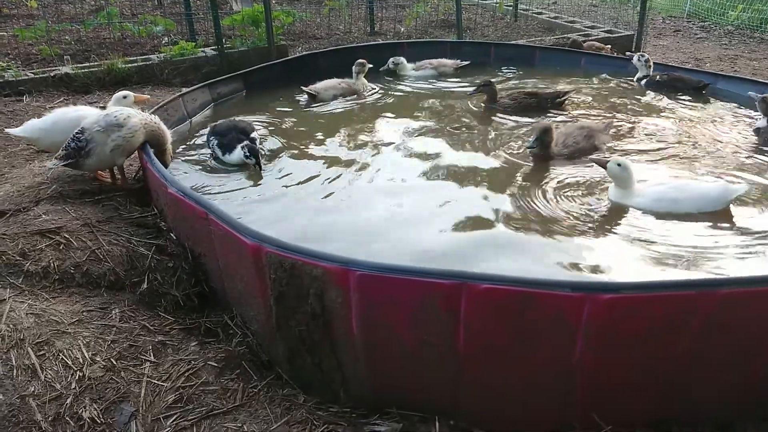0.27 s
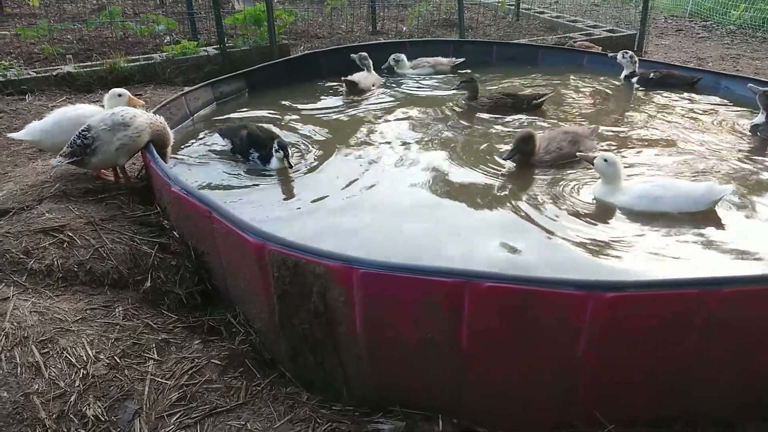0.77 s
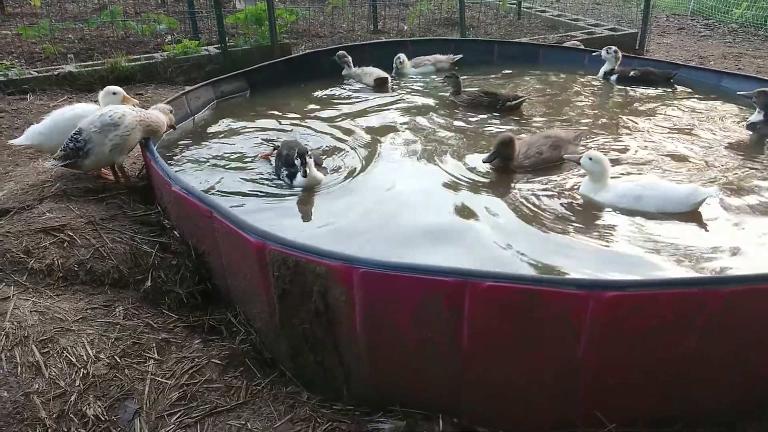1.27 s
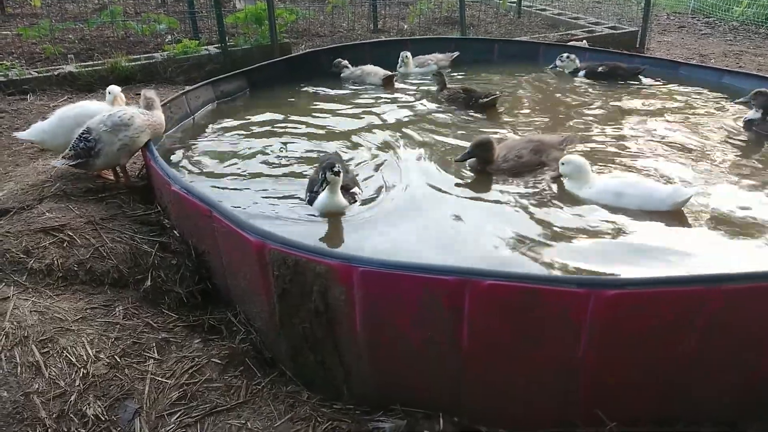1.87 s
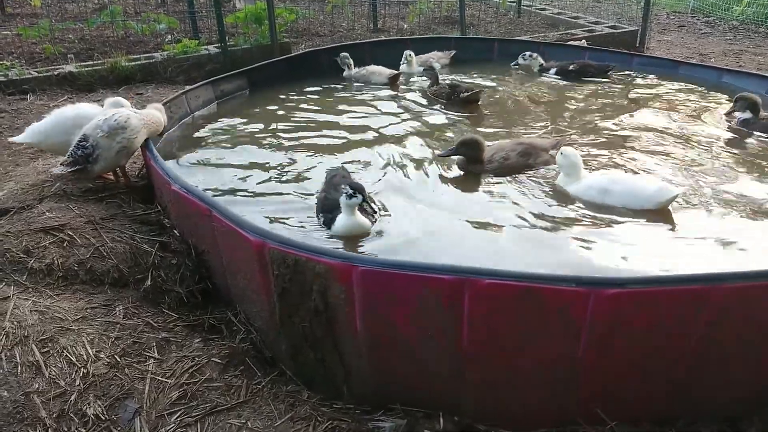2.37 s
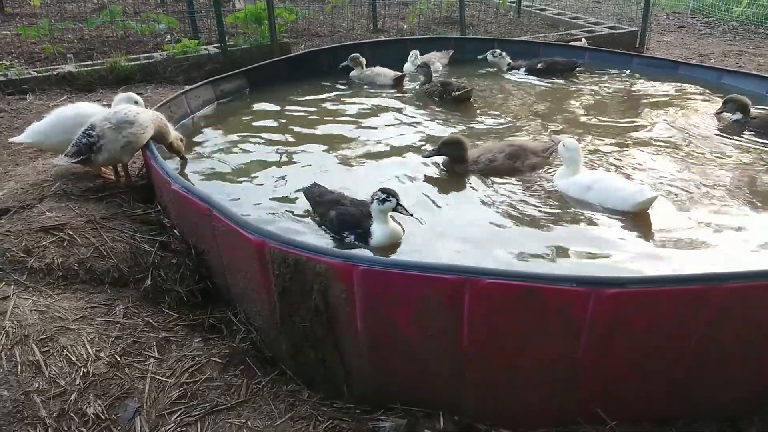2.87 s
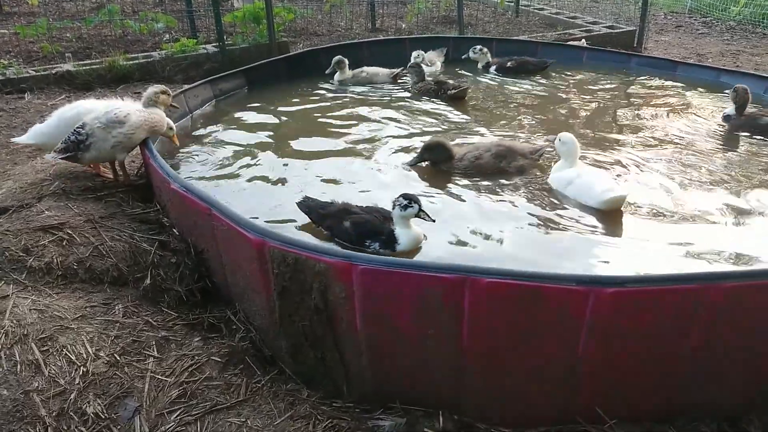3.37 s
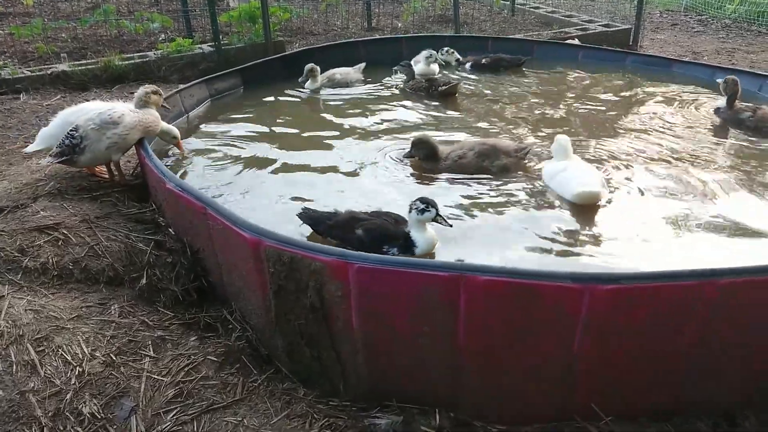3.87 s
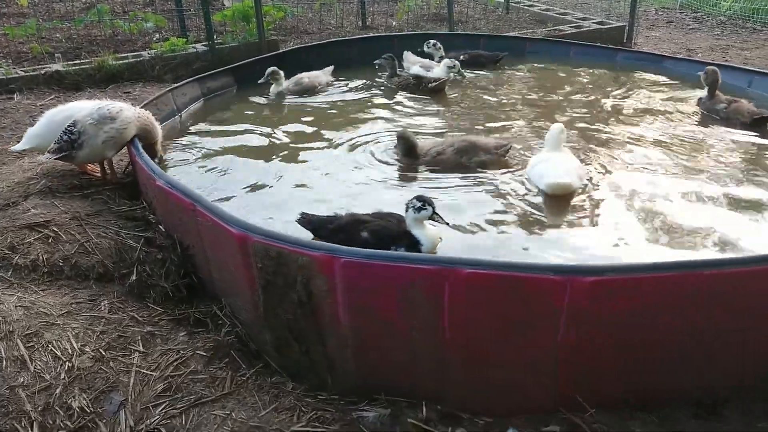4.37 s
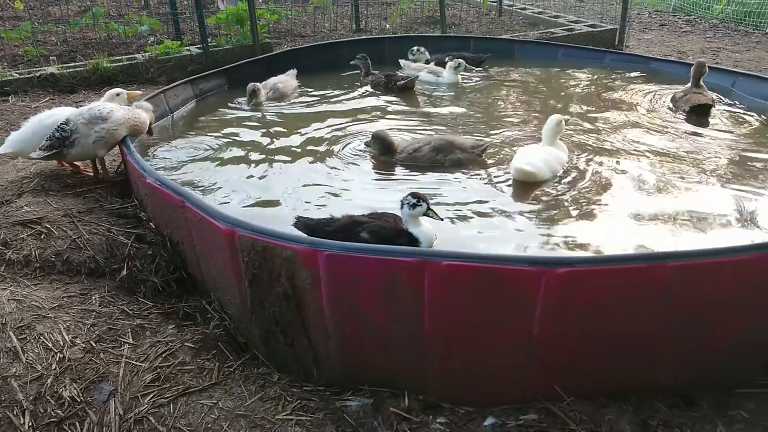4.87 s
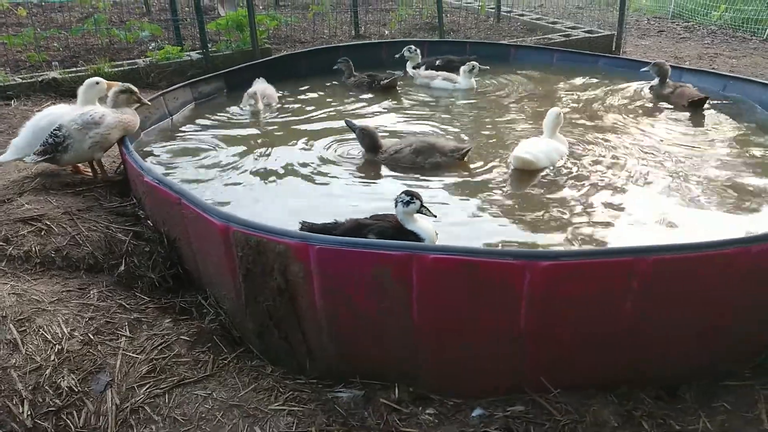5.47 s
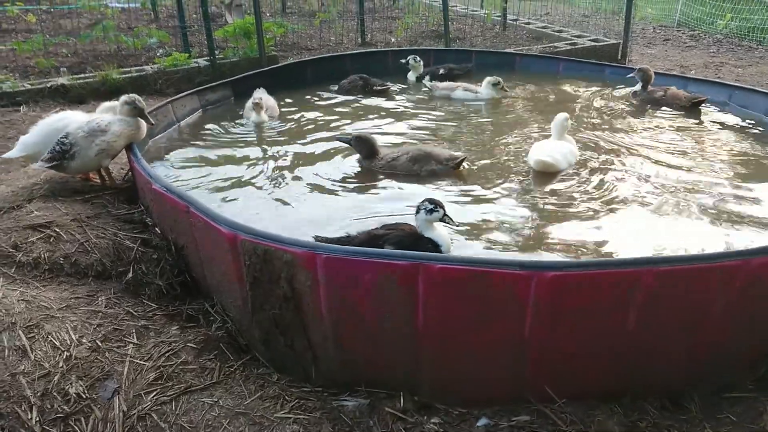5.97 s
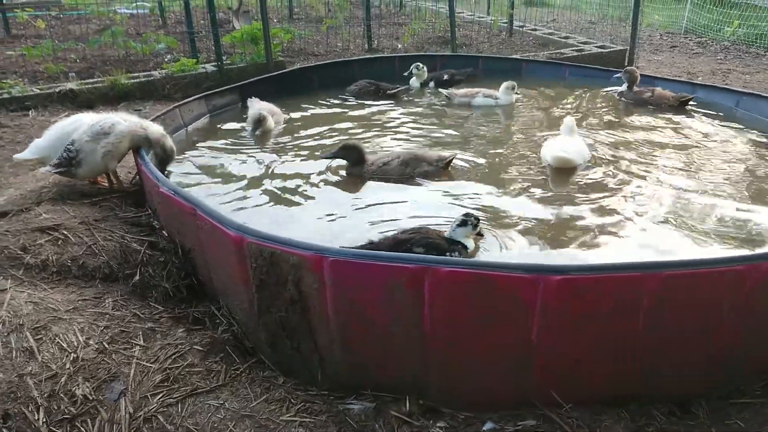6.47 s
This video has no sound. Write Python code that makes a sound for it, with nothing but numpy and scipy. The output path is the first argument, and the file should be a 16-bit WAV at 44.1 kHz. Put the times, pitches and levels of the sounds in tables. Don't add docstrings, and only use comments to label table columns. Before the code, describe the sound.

A hen duck quacks slowly while a drake rasps, then another chuckles in quick runs over trickling water, birdsong and distant engine hum.

```python
import sys
import numpy as np
from scipy import signal
from scipy.fft import rfft, irfft
from scipy.io import wavfile
from scipy.ndimage import uniform_filter1d

SR = 44100
rng = np.random.default_rng(int(sys.argv[2]) if len(sys.argv) > 2 else 0)


def ratio_of_db(decibels):
    return 10 ** (np.asarray(decibels, float) / 20)


def to_wav(sig):
    pcm = np.clip(np.atleast_2d(sig), -1, 1) * 32767
    pcm = np.round(pcm).astype(np.int16)
    wavfile.write(sys.argv[1], SR, pcm.T)


N = 296352


def evened(x):
    return x / np.sqrt(np.mean(x ** 2) + 1e-20)


def read(points, hz):
    f, value = np.transpose(points)
    return np.interp(np.log(hz + 1), np.log(f + 1), value)


def curves(rows):
    s, *columns = np.transpose(rows)
    t = np.arange(s[0], s[-1], 1 / SR)
    return [t] + [np.interp(t, s, c) for c in columns]


def add(mix, s, sound):
    at = round(s * SR)
    sound = sound[max(-at, 0):]
    part = mix[max(at, 0):][:len(sound)]
    part += sound[:len(part)]


def resonate(x, hz, width):
    turn = np.exp(2j * np.pi * np.cumsum(hz * np.ones(len(x))) / SR)
    r = np.exp(-np.pi * width / SR)
    return 2 * (turn * signal.lfilter([1 - r], [1, -r], x / turn)).real


def wander(count, span_s):
    span = round(span_s * SR)
    return evened(uniform_filter1d(uniform_filter1d(rng.standard_normal(count), span), span))


def ports(x, lag_ms):
    hz = np.fft.rfftfreq(N, 1 / SR)
    left = irfft(rfft(x) * np.exp(-2j * np.pi * hz * lag_ms / 1000), N)
    return np.array([left, x])


def tones(tables, waver_db, waver_s, overtone_db, taper):
    out = np.zeros(N)
    for rows in tables:
        t, hz, level_db = curves(rows)
        turn = 2 * np.pi * np.cumsum(uniform_filter1d(hz, size=80)) / SR
        tone = np.sqrt(2) * (np.sin(turn) + ratio_of_db(overtone_db) * np.sin(2 * turn))
        level = ratio_of_db(level_db + waver_db * wander(len(t), waver_s))
        add(out, t[0], level * tone * signal.windows.tukey(len(t), taper))
    return out


def glides(rows):
    first_db, last_db = -11, -6.5
    return [[(s, a, db + first_db), (s + length / 2, (a + b) / 2, db), (s + length, b, db + last_db)]
            for s, length, a, b, db in rows]


def drops(rows, t60, trim_db, glide, edge_db, lag_ms):
    out, t = np.zeros(N), np.arange(6000) / SR
    for s, peak_db, hz in rows:
        ring = np.sin(2 * np.pi * hz * t * (1 + glide * t / t60))
        ring = ring * ratio_of_db(-60 * t / t60) * (1 - np.exp(-t * hz / 0.17))
        edge = ratio_of_db(edge_db - 60 * t / 0.0047) * np.gradient(rng.choice([-1., 1.], len(t)))
        add(out, s, ratio_of_db(peak_db + trim_db - read(RIGHT_PORT, hz)) * (ring + edge))
    return ports(out, lag_ms)


# (frequency [Hz], level per Hz [dB])
YARD_SPECTRUM = [(40, -42), (50, 2), (65, 24), (110, 19), (200, 13), (350, 7), (700, 3.5), (1500, 6),
                 (3000, 6.5), (5000, 8.5), (8000, -5), (15000, 9)]
# (frequency [Hz], likeness [0-1])
PORT_LIKENESS = [(60, 0.91), (200, 0.66), (500, 1), (1500, 0.53), (4000, 0.3), (8000, 0.11)]
# (time [s], level [dB])
BREEZE = [(0.0, -69), (0.65, -76.5), (3.2, -74.5), (3.7, -79), (5.3, -77.5), (5.7, -85), (6.4, -87.5),
          (6.72, -79.5)]


def yard():
    rustle_follows = 0.4
    rustle_db, fizz_db, fizz_flicker_db = 0.5, 2, 1.6
    low_patch_db, patch_db = 1.0, 1.8
    frames, hz = N // 256 + 5, np.fft.rfftfreq(1024, 1 / SR)
    a, b, c, d, patches = rng.standard_normal((frames, 513, 5)).T
    patches = evened(uniform_filter1d(uniform_filter1d(patches, 14, 0), 10, 1))
    f = hz[:, None]
    high = np.clip((f - 5300) / 2500, 0, 1)
    moving = np.clip((f - 800) / 1500, 0, 1) * (1 - .5 * np.exp(-((f - 4700) / 800) ** 2))

    s, breeze_db = np.transpose(BREEZE)
    breeze_now_db = np.interp(np.arange(frames) * 256 / SR, s, breeze_db) - breeze_db.mean()
    follows = rustle_follows + (1 - rustle_follows) * high
    drift_db = (1 - high) * rustle_db + high * fizz_db + follows * breeze_now_db

    flutter = evened(uniform_filter1d(rng.standard_normal(frames), size=3))
    insects_db = 3.4 * np.exp(-((f - 4750) / 350) ** 2) * flutter
    gusts = evened(uniform_filter1d(rng.standard_normal(frames), size=9))
    gusts_db = fizz_flicker_db * high * gusts
    patches_db = np.where(f < 500, low_patch_db, patch_db) * patches
    level_db = read(YARD_SPECTRUM, f) + patches_db + insects_db + gusts_db + moving * drift_db - 88.0

    same = np.clip(read(PORT_LIKENESS, f), 0, 1)
    right = a + 1j * b
    left = same * right * np.exp(-2j * np.pi * f * 0.24 / 1000)
    left = left + np.sqrt(1 - same ** 2) * (c + 1j * d)
    z = np.array([left, right]) * ratio_of_db(level_db)
    return signal.istft(z, nperseg=1024, noverlap=768)[1][:, :N]


# (time [s], pitch [Hz], level [dB])
ENGINES = [
    [(.6, 166, -73.5), (1.5, 168.4, -65), (2.4, 168.2, -57.5), (3.2, 171.5, -53), (4, 176.4, -51),
     (4.7, 187.2, -58), (5.3, 195.7, -59), (5.55, 212, -63), (5.95, 230.3, -70)],
    [(0.0, 59.2, -63.5), (2.81, 68.2, -67), (6.38, 64.65, -69.5), (6.72, 59.8, -62.5)],
    [(0.0, 105.7, -61), (0.91, 103.4, -69.5), (3.78, 111.2, -66.5), (4.1, 104, -60.5)],
    [(5.2, 87.3, -65.5), (6.066, 131.7, -68), (6.398, 186.4, -64), (6.588, 151.6, -61.5), (6.72, 155, -72)],
]


def distant_engines():
    return ratio_of_db(-3.5) * tones(ENGINES, 2.03, 0.028, -32.0, 0.0079)


def crackle(per_s, level_db, spread_db):
    struck = rng.random((N, 2)).T < per_s / SR
    size = ratio_of_db(spread_db * np.minimum(rng.exponential(1, (N, 2)).T, 5)) * struck
    tick = rng.standard_normal(40) * np.exp(-np.arange(40) / 16.5)
    both = size + 2.87 * np.roll(size[::-1], 6, axis=1)
    return ratio_of_db(level_db) * signal.oaconvolve(both, np.diff(tick)[None])[:, :N]


# (time [s], peak level [dB])
SNAPS = [(0.2204, -56), (0.239, -45), (0.415, -48), (0.517, -49), (0.6704, -53), (0.7168, -55),
         (0.8011, -57), (0.9971, -50), (1.1543, -60), (1.187, -49), (1.2765, -49), (1.715, -50),
         (1.9155, -50), (1.9939, -52), (2.006, -44), (2.0448, -48), (2.2087, -54), (2.2882, -57),
         (2.372, -47), (2.4808, -44), (2.5303, -42), (2.5875, -52), (2.7257, -43), (2.92, -49),
         (2.9472, -42), (3.0575, -38), (3.417, -57), (3.5129, -52), (3.5468, -54), (3.5957, -49),
         (3.8087, -60), (4.114, -52), (4.2283, -55), (4.4677, -46), (4.527, -49), (4.908, -50),
         (5.006, -50), (5.1863, -48), (5.2121, -49), (6.499, -53)]


def straw_snaps():
    ring_hz, t60_s = 11900, 0.0016
    return drops([(s, db, ring_hz) for s, db in SNAPS], t60_s, -3.5, 0, -14, 0.17)


# (time [s], peak level [dB], ring [Hz])
TICKS = [(.5215, -23.5, 3880), (.7175, -44, 6080), (2.2139, -37, 2700), (2.346, -34, 3700),
         (2.3714, -38, 4250), (2.4076, -34, 4600), (2.5343, -29.5, 4220), (2.729, -33, 4170),
         (2.9494, -36, 4000), (3.068, -38, 4500), (3.5493, -32, 3240), (4.2195, -30.5, 2620),
         (4.3812, -27.5, 3500), (4.4484, -34.5, 3580), (4.4664, -37, 4830), (4.5514, -39, 4500),
         (4.8557, -34, 4670), (4.9086, -33, 2650), (4.9856, -36, 4810), (5.19, -39, 4140),
         (6.238, -45, 3400), (6.455, -45, 2000), (6.47, -46, 1900), (6.4998, -39, 4960),
         (6.54, -37.5, 3270), (6.6052, -36, 2800)]


def beak_ticks():
    return drops(TICKS, 0.006, 5.4, 0.02, -0.032, 0.2)


# (time [s], peak level [dB], ring [Hz])
DRIPS = [(1.157, -24, 930), (1.164, -29, 2600), (1.31, -43, 1900), (3.803, -40, 855), (4.205, -44, 1100),
         (1.2092, -31, 2900), (1.5554, -32, 4150), (1.6217, -34.5, 4270), (1.952, -30.5, 3460),
         (2.16, -21.5, 4720), (3.8469, -25, 5090), (4.0392, -30.5, 3010), (4.274, -35, 3870),
         (4.799, -34.5, 2500), (4.879, -35, 2900), (4.93, -38, 1800), (5.899, -46, 2090),
         (5.915, -40, 2500), (4.9457, -33, 3700)]


def drips():
    return drops(DRIPS, 0.0075, 2.4, 0.029, -3.5, 0.21)


# (time [s], peak level [dB], ring [Hz])
PLOPS = [(3.704, -50, 316), (3.802, -65, 437), (3.84, -48, 360), (4.141, -54, 770), (4.311, -48, 1234),
         (4.856, -49, 313), (4.855, -52, 850), (4.907, -51, 1510), (5.609, -55, 1140), (5.925, -57, 1760),
         (6.148, -56, 784), (6.252, -59, 1130), (6.58, -62, 1500), (6.633, -45.5, 1850)]


def plops():
    return drops(PLOPS, 0.046, 6.0, 0.33, -20, -0.13)


# (time [s], peak level [dB], ring [Hz])
THUMP = [
    (4.095, -40, 97.7),
]


def wall_knock():
    return drops(THUMP, 0.41, .1, 0.02, -30, .3)


# (time [s], length [s], level [dB], pitch [Hz])
GURGLES = [(1.679, 0.014, -64, 497), (1.865, 0.017, -60.5, 700), (1.917, .025, -58.5, 443),
           (2.507, 0.065, -61, 286), (3.42, 0.036, -65.5, 443), (3.558, 0.072, -63.5, 374),
           (3.69, 0.06, -64, 453), (3.977, 0.038, -63, 486), (4.135, .06, -61.5, 480),
           (4.201, 0.012, -61, 1000), (6.456, 0.2, -69.5, 330)]


def gurgles():
    out = np.zeros(N)
    for s, length, level_db, hz in GURGLES:
        noise = rng.standard_normal(round(length * SR))
        swirl = resonate(resonate(noise, hz, 0.5 * hz), hz, 0.5 * hz)
        add(out, s, ratio_of_db(level_db) * evened(swirl) * np.hanning(len(noise)))
    return out


# (time in the beat [s], pitch [Hz], level [dB])
RISING_NOTE = [(-.046, 5580, -5), (-.032, 6580, -1.5), (-.016, 7500, -7)]
FALLING_NOTE = [(0, 7060, 7), (.005, 6140, 3), (.012, 5270, 1.5), (0.023, 4900, -6), (.04, 4430, -10)]
# (time [s], length [s], level [dB])
CHIPS = [(0.032, .06, -50), (0.907, .06, -56), (2.4, .11, -57), (3.271, .15, -55.5), (3.739, .02, -58),
         (4.788, .11, -59), (5.762, .11, -54), (6.061, .2, -58.5), (6.368, .07, -62), (6.503, .15, -56)]
# (time in the chip [s], pitch [Hz], level [dB])
CHIP_NOTE = [(0, 5182, -13), (.01, 4836, -6), (0.028, 4600, -8)]
# (time [s], level [dB])
LOW_CHIPS = [(6.125, -57), (6.17, -59), (6.21, -56), (6.245, -59)]
# (time in the chip [s], pitch [Hz], level [dB])
LOW_CHIP_NOTE = [(0, 4660, -7), (.01, 4400, 2), (.024, 4200, -10)]


def songbird():
    start_s, end_s, beat_s, chip_beat_s = 3.575, 4.85, .1035, 0.059
    trill_db, swell_db_per_s, scatter_db = -59, 5.5, 2.0
    trill = [(s, trill_db + swell_db_per_s * (s - start_s)) for s in np.arange(start_s, end_s, beat_s)]
    chips = [(s + dt, db) for s, length, db in CHIPS for dt in np.arange(0, length, chip_beat_s)]
    beats = []
    for rows, note in [(trill, RISING_NOTE), (trill, FALLING_NOTE), (chips, CHIP_NOTE)]:
        beats.append(([(s, db + scatter_db * rng.standard_normal()) for s, db in rows], note))
    beats.append((LOW_CHIPS, LOW_CHIP_NOTE))
    notes = [[(s + dt, hz, db + lift_db) for dt, hz, lift_db in note]
             for rows, note in beats for s, db in rows]
    return tones(notes, 2.6, 0.00095, -43, 0.16)


# (time [s], length [s], top pitch [Hz], level [dB], depth of the arch [share of pitch])
PEEPS = [(0.099, 0.053, 1970, -56.5, 0.32), (0.12, 0.024, 2460, -67, 0.061),
         (5.273, 0.026, 2130, -53.5, 0.13), (5.432, 0.024, 2400, -51, 0.043),
         (5.456, .018, 2350, -50, 0.071), (6.631, 0.074, 2800, -58, 0.49)]
# (time [share of length], drop below the top [share of depth], level [dB])
PEEP_ARCH = [(0, 1, -5), (.22, .4, 0), (.42, 0, 0), (.7, .4, 0), (1, 1.05, -3)]
# (time [s], length [s], first pitch [Hz], last pitch [Hz], level [dB])
WHISTLES = [(3.77, .04, 2730, 2700, -54), (3.935, .045, 2740, 2740, -58), (3.84, .12, 2230, 2180, -59),
            (3.97, .035, 1250, 3100, -55), (4.012, .026, 3050, 1700, -56), (4.52, .09, 1900, 2380, -62),
            (4.35, .07, 2950, 2910, -53), (4.405, .04, 3350, 2650, -52), (4.445, .05, 2620, 2630, -59),
            (3.31, .05, 2720, 2680, -64)]
# (time [s], length [s], first pitch [Hz], last pitch [Hz], level [dB])
FAR_WHISTLES = [(3.745, .035, 1890, 2660, -70), (3.805, .045, 2650, 2230, -61),
                (3.885, 0.044, 2750, 2800, -65), (4.051, 0.084, 2720, 2670, -69),
                (4.37, 0.051, 900, 900, -71), (5.78, .05, 3050, 2700, -72), (6.02, .045, 4400, 3020, -68),
                (6.325, 0.036, 2820, 2680, -69), (6.66, 0.032, 4400, 2920, -63),
                (6.225, 0.023, 2050, 2000, -71)]


def ducklings():
    arches = [[(s + u * length, (1 - k * depth) * hz, db + lift_db) for u, k, lift_db in PEEP_ARCH]
              for s, length, hz, db, depth in PEEPS]
    return ratio_of_db(3.5) * tones(arches + glides(WHISTLES) + glides(FAR_WHISTLES), 1.5, .006, -20, .3)


def syrinx(hz, jitter, uneven_db, rough, first_turn):
    speed = np.clip(1 + jitter * wander(len(hz), 0.00287), .2, 3)
    turns = np.cumsum(hz * speed) / SR + first_turn
    cycle = turns.astype(int)
    size, shift = rng.standard_normal((cycle[-1] + 1, 2)).T
    swing = uniform_filter1d(ratio_of_db(uneven_db * size[cycle]), size=40)
    partials = np.arange(1, 9000 // hz.max())
    clicks = np.cos(2 * np.pi * np.outer(turns - .5, partials)).sum(axis=1) * swing
    puffs = np.exp(-((turns - .5) % 1) / .5) * rng.standard_normal(len(hz)) * swing
    rough = np.clip(rough, 0, 1)
    return (1 - rough) * evened(clicks), rough * evened(puffs), shift[cycle]


# (time [s], length [s], level [dB], centre of the beak ring [Hz])
RASPS = [(-.01, 0.052, -52, 2790), (0.262, 0.056, -49.5, 2740), (0.525, 0.054, -50, 2760),
         (0.837, 0.037, -49.5, 2800), (1.089, 0.052, -51, 2760), (1.151, 0.045, -57.5, 2840),
         (1.362, 0.061, -49, 2735), (1.649, 0.058, -52, 2730), (1.87, 0.074, -53, 2650),
         (2.194, 0.052, -56.5, 2700), (2.47, 0.068, -56, 2590), (3.448, 0.059, -56, 2630),
         (3.797, 0.026, -62.5, 2220), (3.835, 0.056, -58.5, 2560), (4.206, 0.052, -59.5, 2560),
         (4.289, 0.038, -63.5, 2200), (4.567, 0.057, -58.5, 2500), (4.986, 0.057, -60.5, 2140),
         (6.422, 0.07, -70.5, 2020)]
# (factor on the beak ring [ratio], width [Hz], level [dB])
RASP_THROAT = [(.74, 400, -3), (1.01, 290, 3.5), (1.2, 286, -5.5), (2.6, 900, -24.5)]


def drake():
    flaps_hz, first_turn = 91, .24
    sag = 0.11
    out = np.zeros(N)
    for s, length, level_db, ring_hz in RASPS:
        count = round(length * SR)
        clicks, puffs, shift = syrinx(np.full(count, flaps_hz), .05, 1.2, .56, first_turn)
        bent_hz = ring_hz * (1 + .015 * shift + sag * np.linspace(.5, -.5, count))
        rings = 0
        for k, width, db in RASP_THROAT:
            ring = resonate(clicks + puffs, k * bent_hz, 0.61 * width)
            rings = rings + ratio_of_db(db) * resonate(ring, k * bent_hz, 1.0 * width)
        add(out, s, ratio_of_db(level_db + 8.5) * evened(rings) * signal.windows.tukey(count, .72))
    return out


def throat_rings(drive, group, moved, tilt_db):
    rings = 0
    for k, (hz, width, db) in enumerate(group):
        gain = (-1) ** k * ratio_of_db(db + tilt_db * np.log2(hz / group[1][0]))
        ring = resonate(resonate(drive, hz * moved, 1.29 * width), hz * moved, 1.39 * width)
        rings = rings + gain * ring * ratio_of_db(0.13 * rng.standard_normal())
    return evened(rings)


def hen(calls, mouths, shape, follow, fade_db, beak, throat, jitter, roughs, trims_db, scatter, spike_db):
    follows_pitch = 0.35
    usual_hz = np.mean(calls, axis=0)[3]
    out = np.zeros(N)
    for (s, length, chest_db, hz, strain_db), mouth in zip(calls, mouths):
        ring_db, lean_db, chest_lean_db, drift, hoarse = mouth
        t, mouth_db, bend = curves(np.array(shape) * [length, 1, 1])
        bend = bend * (1 + drift * (2 * t / length - 1))
        clicks, puffs, shift = syrinx(hz * bend, jitter, 1.0, .55, rng.random())
        beak_db = ring_db + beak[0] + beak[1] * strain_db + beak[2] * (s - calls[0][0])
        spike = evened(resonate(clicks, 1800, 2400))
        sound = ratio_of_db(chest_db + mouth_db + beak_db + spike_db) * spike

        levels_db = (0, beak_db, strain_db + fade_db * t / length)
        roughness = (roughs[0], np.clip(hoarse, .05, .6), roughs[1])
        tilts_db = (chest_lean_db, lean_db, 0)
        groups = zip(throat, follow, levels_db, roughness, trims_db, tilts_db)
        for group, share, rel_db, rough, trim_db, tilt_db in groups:
            drive = (1 - rough) * clicks + rough * puffs
            moved = np.sqrt(bend) * (hz / usual_hz) ** follows_pitch + scatter * rough * shift
            level = ratio_of_db(chest_db + share * mouth_db + rel_db + trim_db)
            sound = sound + level * throat_rings(drive, group, moved, tilt_db)
        add(out, s + t[0], sound * signal.windows.tukey(len(t), .1))
    return out


# (time [s], length [s], effort [dB], pitch [Hz], strain of the throat [dB])
CHUCKLES = [(2.67, 0.05, -54, 368.8, 18.5), (2.77, 0.046, -54, 380, 16), (2.857, 0.054, -52, 378, 11.5),
            (2.945, 0.05, -50, 365.6, 8.5), (3.035, 0.047, -49.5, 346.5, 4.5),
            (3.13, 0.047, -48.5, 308.5, -1), (3.22, 0.05, -50, 314.2, -1.5),
            (3.31, .045, -58.5, 270.2, 3.5), (5.032, 0.042, -48.5, 382.6, 1.5),
            (5.115, 0.047, -50, 360.4, 4.5), (5.2, 0.052, -51, 373.5, 6.5), (5.275, 0.062, -51, 367, 6),
            (5.38, 0.057, -50.5, 332.3, 2.5), (5.467, 0.052, -50.5, 320.8, 1.5),
            (5.56, 0.037, -61.5, 328, 9)]
# (beak ring [dB], beak lean to the treble [dB per octave],
# chest lean [dB per octave], pitch drift over the call [share], hoarseness [0-1])
CHUCKLE_MOUTHS = [(-2.5, 22, 8, 0.0096, 0.4), (1, 0, 2, 0.0145, .22), (1, -5, 1, .01, .13),
                  (-0.5, -7, -1, .01, .11), (0.5, 2, 1, -0.0204, .09), (1.5, 9, -1.5, 0.0092, .09),
                  (1, 6, 0.5, -0.0165, 0.14), (2, 6, 0, -0.092, 0.47), (-2.5, 13, -1, .01, .12),
                  (-1.5, -2, -1, 0.013, .14), (-1, -5, -2, 0.00092, .14), (-1.5, 4, -0.5, 0.0094, .14),
                  (1.5, 1, 0, -0.0175, .07), (2, 7, -1, -0.0285, .07), (-7, .1, 4, -0.0022, 0.28)]
# (time [share of length], mouth opening [dB], pitch factor [ratio])
CHUCKLE_SHAPE = [(-.1, -24, .8), (.2, -5, .945), (.55, 0, 1.035), (.85, -3, .94), (1.2, -18, .68)]
# (frequency [Hz], width [Hz], level [dB])
CHUCKLE_THROAT = [
    [(283, 220, 2.1), (745, 83, 9.4), (1070, 150, 1.7)],
    [(1490, 500, 11), (2400, 440, 3), (2650, 270, 5)],
    [(2800, 1640, 0.5), (3730, 740, 6.5), (4500, 460, 3.5), (5620, 210, 8.5), (7000, 3800, -5.5)],
]
# (time [s], length [s], first pitch [Hz], last pitch [Hz], level [dB])
GULP = [
    (3.308, 0.054, 326.5, 174, -47.5),
    (4.935, 0.06, 427, 386, -56.5),
]


def chuckling_hen():
    calls = hen(
        CHUCKLES, CHUCKLE_MOUTHS, CHUCKLE_SHAPE,
        follow=(.75, 1, .28),
        fade_db=-1.5,
        beak=(-5, 0.48, 0.2),
        throat=CHUCKLE_THROAT, jitter=.008, roughs=(.04, .52),
        trims_db=(0.5, 5.5, -5),
        scatter=.05, spike_db=-16)
    return calls + tones(glides(GULP), 1.5, 0.004, -16, 0.35)


# (time [s], length [s], effort [dB], pitch [Hz], strain of the throat [dB])
QUACKS = [(.001, 0.042, -53, 185.8, 1.5), (.235, 0.075, -51.5, 203.7, 5), (.517, 0.08, -53.5, 193, 4.5),
          (.804, 0.076, -54, 199, 9.5), (1.074, 0.087, -54, 196.8, 7), (1.453, 0.069, -53.5, 190.4, 5.5),
          (1.708, .08, -54, 203.2, 5.5), (1.986, 0.07, -52, 192.8, -1), (2.277, 0.073, -53, 198, 1),
          (2.575, 0.069, -54, 188.5, -1)]
# (beak ring [dB], beak lean to the treble [dB per octave],
# chest lean [dB per octave], pitch drift over the call [share], hoarseness [0-1])
QUACK_MOUTHS = [(2, 5, -3, -0.0384, 0), (-1, -5.5, -1.5, -0.046, 0.2), (1.3, 4, -1.5, 0.0047, 0.32),
                (1.5, 4, 0, 0.014, 0.45), (2, 2, 0, .01, 0.17), (-0.5, -0.5, 0, -.02, 0.36),
                (-0.5, -6, 1, -.02, 0.2), (1.5, 4, 1.3, .01, 0.22), (0.3, 3, 2.5, -0.014, 0.28),
                (0.3, 5.5, 0.5, -0.02, 0.34)]
# (time [share of length], mouth opening [dB], pitch factor [ratio])
QUACK_SHAPE = [(-.35, -34, .9), (-.03, -21, .93), (.03, -4, .955), (.4, 0, 1.04), (.7, -3, .98),
               (.92, -9, .88), (1.15, -24, .8)]
# (frequency [Hz], width [Hz], level [dB])
QUACK_THROAT = [
    [(224, 101, -1), (436, 166, 0), (686, 100.5, 9)],
    [(1380, 264, 4.5), (1882, 175, 8.5), (2323, 385, 5.5), (2530, 2080, -9)],
    [(3700, 800, -8), (4600, 330, 2.5), (5470, 260, 3), (7750, 1900, -0.5)],
]


def quacking_hen():
    return hen(
        QUACKS, QUACK_MOUTHS, QUACK_SHAPE,
        follow=(.5, 1, 1.1), fade_db=-4.5, beak=(4.6, 0.29, 2.7),
        throat=QUACK_THROAT, jitter=.014, roughs=(.08, .58),
        trims_db=(4.5, 5, -1.5), scatter=.07, spike_db=-1.5)


# (frequency [Hz], time to fall 60 dB [s])
FENCE_T60 = [(200, 0.22), (750, 0.34), (1200, 0.2), (3000, 0.45), (8000, 0.16)]


def fence(x):
    taps = np.zeros((2, SR // 2))
    at = np.arange(200, SR // 2 - 20, 20) + rng.integers(0, 20, (2, (SR // 2 - 201) // 20))
    np.put_along_axis(taps, at, rng.choice([-1., 1.], at.shape), 1)
    hz, t, z = signal.stft(taps, SR, nperseg=128)
    tail = signal.istft(z * ratio_of_db(-60 * t / read(FENCE_T60, hz)[:, None]), SR, nperseg=128)[1]
    return signal.fftconvolve(x[None], tail / np.linalg.norm(tail[0]), axes=1)[:, :N]


def scene():
    engines, trill, peeps = distant_engines(), songbird(), ducklings()
    rasps, chuckles, quacks = drake(), chuckling_hen(), quacking_hen()
    water = beak_ticks() + drips() + plops() + wall_knock() + ports(gurgles(), 0.19)
    near = ports(engines, 0.36) + ports(trill, 0.13) + ports(peeps, -0.22) + water
    near = near + ports(chuckles, 0.339) + ports(quacks + rasps, -0.26)
    to_fence = ratio_of_db(-14) * quacks + ratio_of_db(-16.5) * rasps + ratio_of_db(-7) * chuckles
    to_fence = to_fence + ratio_of_db(-12.5) * (peeps + trill) + ratio_of_db(-16) * water[1]
    return near + fence(to_fence) + yard() + straw_snaps() + crackle(80, -63.0, 2.7)


# (frequency [Hz], level [dB])
LEFT_PORT = [(60, 3), (400, 1), (1000, 1), (2000, -2), (3000, -4.5), (4000, -1.5), (4600, 8.5),
             (5200, -7.5), (5800, -10), (8000, -7), (9500, -8), (11000, -7), (13200, -10), (15800, -17.5)]
RIGHT_PORT = [(60, 6.5), (1000, 6.5), (3000, 6.5), (4000, 8.5), (4800, 13.5), (5400, 8.5), (6100, -4),
              (8500, -2), (10000, -21), (11300, -23), (13200, -14.5), (15800, -24)]


def port_colour(x):
    hz = np.abs(np.fft.fftfreq(4096, 1 / SR))
    log_gain = np.log(ratio_of_db(np.array([read(LEFT_PORT, hz), read(RIGHT_PORT, hz)])))
    colour = np.fft.ifft(np.exp(np.conj(signal.hilbert(log_gain)))).real[:, :2048]
    return signal.oaconvolve(x, colour, axes=1)[:, :N]


def band_limit(x):
    return signal.sosfilt(signal.butter(12, 15830, fs=SR, output="sos"), x)


def record(dry):
    low_cut = signal.butter(4, 39, "high", fs=SR, output="sos")
    mix = port_colour(signal.sosfilt(low_cut, dry))
    return band_limit(mix)


dry = scene()
out = record(dry)
to_wav(out)
```